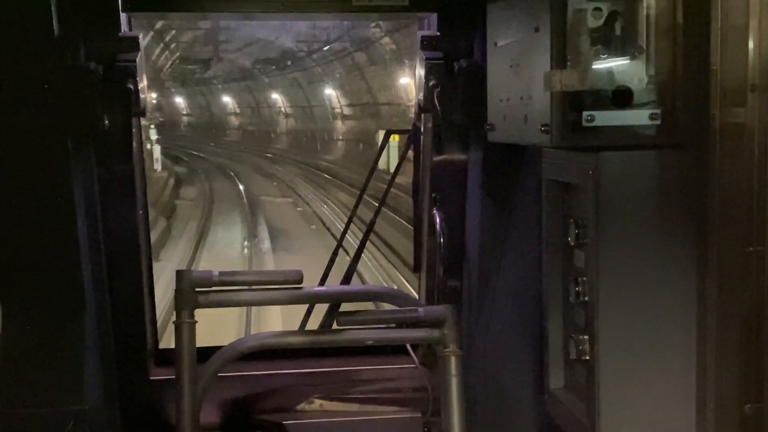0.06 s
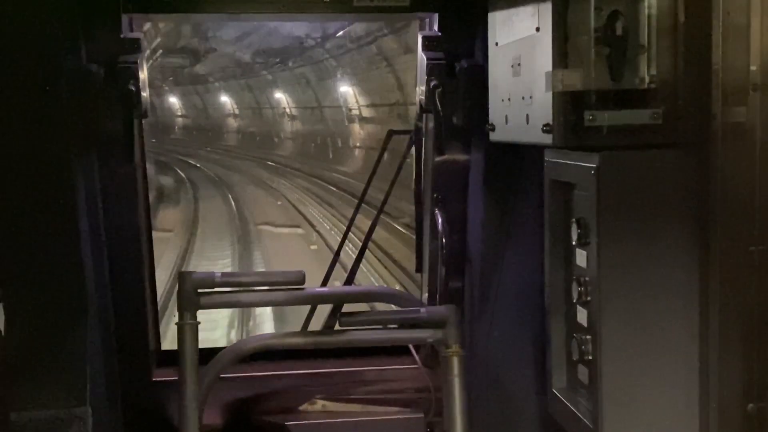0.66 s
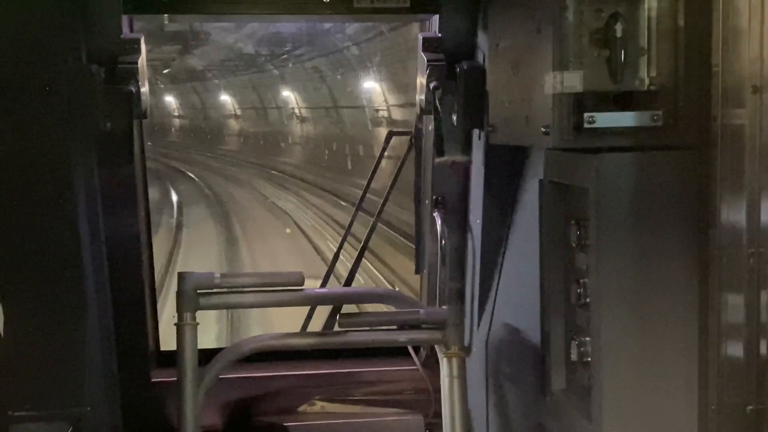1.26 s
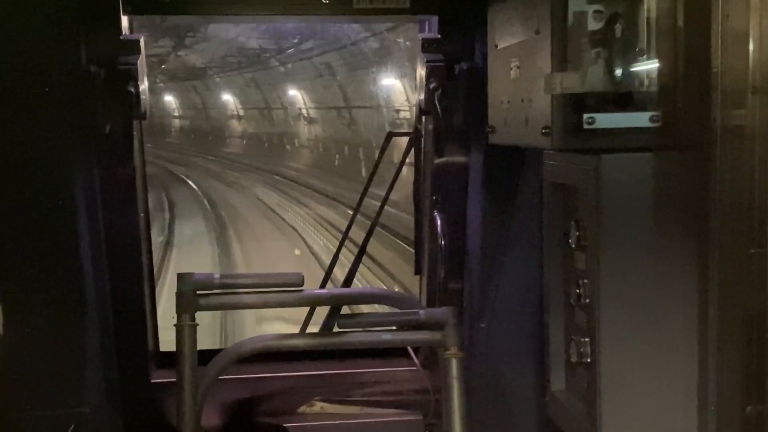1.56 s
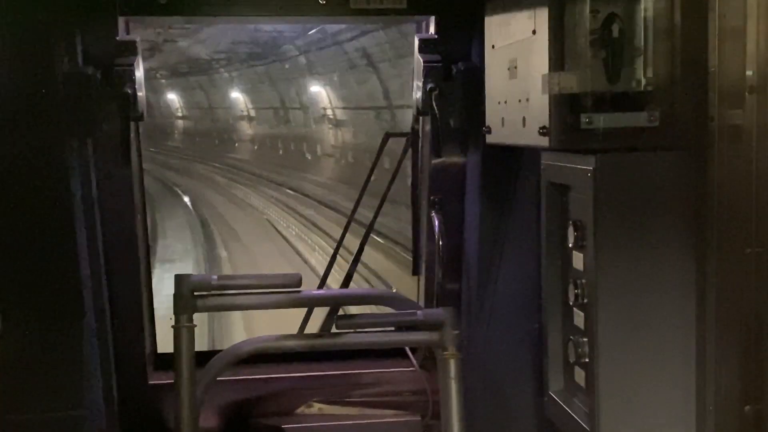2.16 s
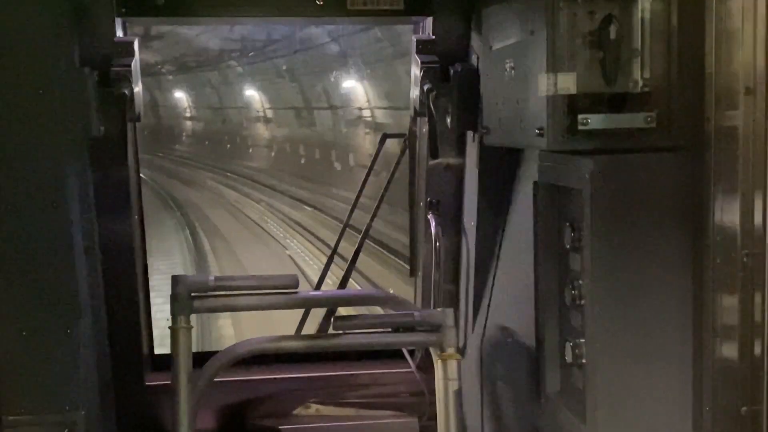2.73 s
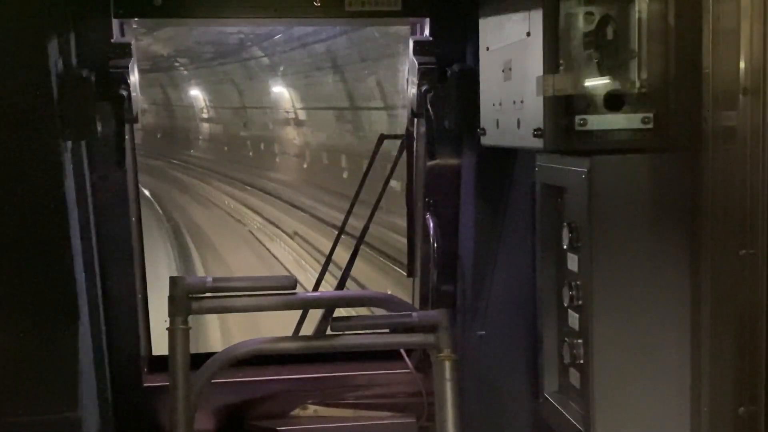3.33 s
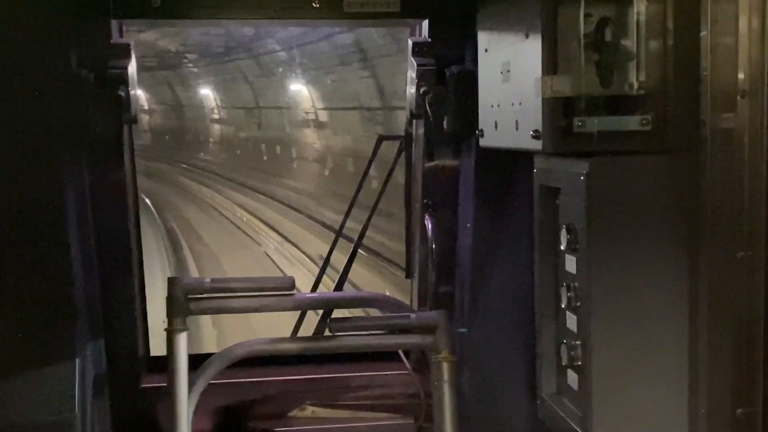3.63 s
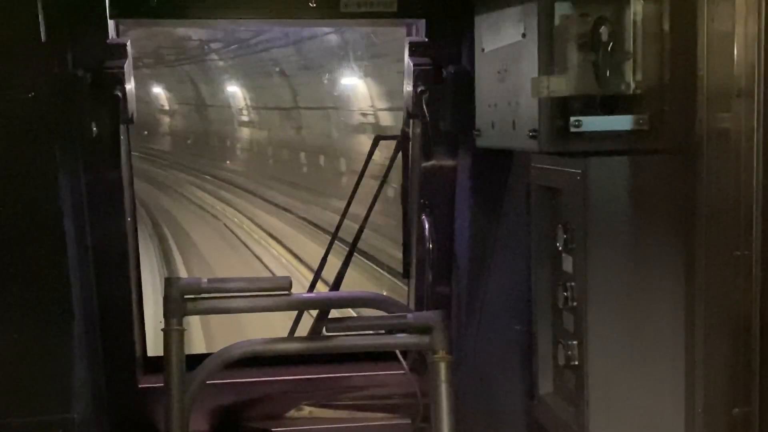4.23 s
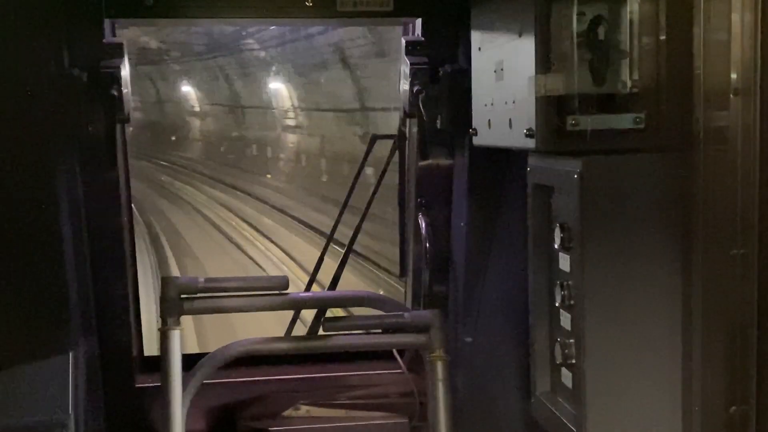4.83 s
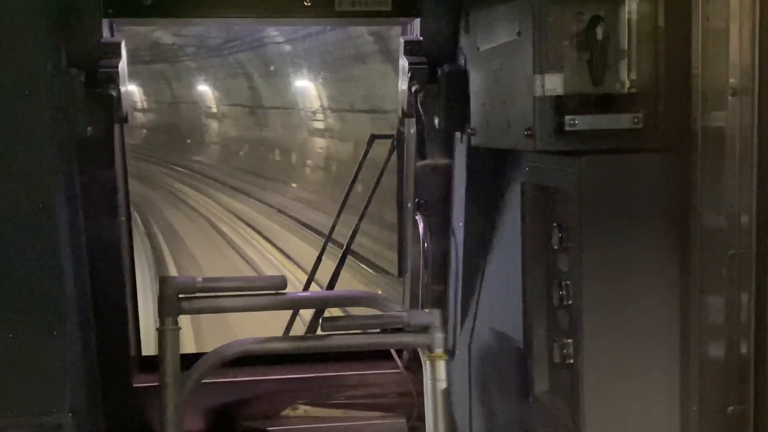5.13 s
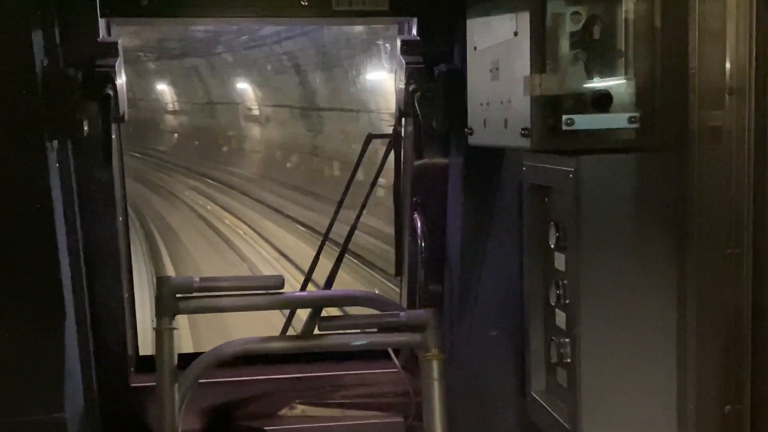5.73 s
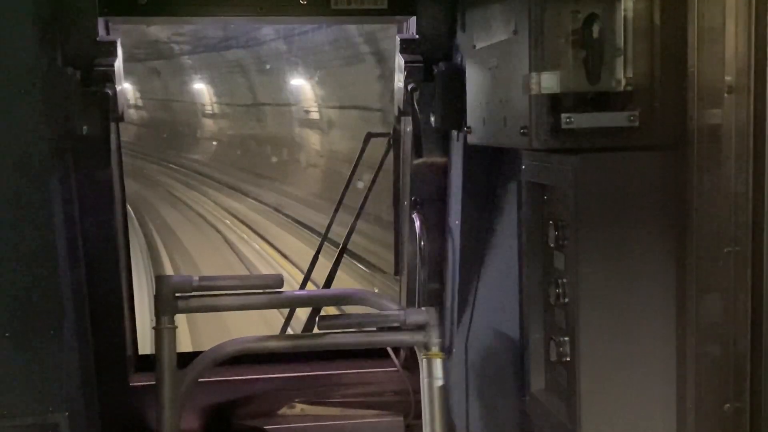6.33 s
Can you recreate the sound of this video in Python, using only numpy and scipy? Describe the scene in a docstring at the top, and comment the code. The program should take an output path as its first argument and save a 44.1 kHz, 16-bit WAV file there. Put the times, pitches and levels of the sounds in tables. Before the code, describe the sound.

Heard behind the windscreen of a subway train in a tunnel, the car rumbles steadily under rushing air and a slowly easing motor hum. As the bend tightens, the rails set up a pulsing low drone and a wavering howl, both strongest in the second half. Steel wheels growl, scrape and grind against the track, giving short squeals, and scattered dull knocks come up through the floor.

```python
"""Subway front car in a long tunnel curve.

The body rumbles and the traction motors hum under a steady rush of air. As the curve tightens the
wheels creep sideways: the bogie growls, the flanges scrub, hiss and squeal. Rail flaws knock, and
rippled rail drives a throbbing drone near 250 Hz with a rough howl near its octave."""
import sys
import numpy as np
from scipy import signal
from scipy.fft import rfft, irfft
from scipy.io import wavfile

SR = 44100
rng = np.random.default_rng(int(sys.argv[2]) if len(sys.argv) > 2 else 0)


def transcribe(u):
    """Save the signal u as a 16-bit wav file named by the first command-line argument.

    u: samples, shape (n,) or (channels, n), limited to [-1, 1]; the rate is SR.
    q: integer samples, one column per channel.
    """
    v = np.clip(np.atleast_2d(u).T, -1, 1)
    q = np.round(v * 32767).astype(np.int16)
    wavfile.write(sys.argv[1], SR, q)


N = 290178
TIME = np.arange(N) / SR
FREQ = np.maximum(np.arange(N // 2 + 1) * SR / N, 1)
SIDES = np.array([[1], [-1]])  # left, right

# phase lead of the left ear in the cab: f/Hz, lead/rad
EAR_LEAD = [(120, -0.58), (260, 0.25), (400, -1.2), (490, .25), (650, -0.27), (1200, 0.058), (1900, 0.92),
            (2500, -0.53), (3400, -0.57), (5500, 0)]


def gain_of(db):
    """Decibels to amplitude."""
    return 10 ** (np.asarray(db) / 20)


def unit(x):
    """Scale to rms 1."""
    return x / np.sqrt(np.mean(x ** 2))


def controls(table):
    """Each column after t/s, interpolated per sample."""
    times_s, *columns = np.transpose(table)
    return [np.interp(TIME, times_s, column) for column in columns]


def across(points):
    """Points joined on a log-frequency axis."""
    hz, value = np.transpose(points)
    return np.interp(np.log(FREQ), np.log(hz), value)


def bell(hz, width_hz, db=0):
    """Gain of a Gaussian band."""
    return gain_of(db) * np.exp(-((FREQ - hz) / width_hz) ** 2)


def bump(at_s, half_s):
    """Gaussian rise and fall around a moment."""
    return np.exp(-((TIME - at_s) / half_s) ** 2)


def walk(rate_hz):
    """Smooth random drift, rms 1."""
    lowpass = np.exp(-(FREQ / rate_hz) ** 2) * (FREQ > 1)
    return unit(irfft(rfft(rng.standard_normal(N)) * lowpass, N))


def sustained(x, hold_s, firmness):
    """Continuously driven vibration: the phase wanders, the strength fades less than in noise."""
    power = np.abs(signal.hilbert(x, axis=1)) ** 2
    smooth_power = irfft(rfft(power.mean(axis=0)) * np.exp(-(FREQ * hold_s) ** 2), N)
    x = x / (np.abs(smooth_power) + 0.08) ** (firmness / 2)
    return x / np.std(x.mean(axis=0))


def glide(x, speed):
    """Resample a vibration at a changing speed ratio."""
    place = np.cumsum(speed)
    return np.array([np.interp(place, np.arange(N), ear, period=N) for ear in x])


def cab_noise(colour):
    """Unit-level shaped noise; bass reaches both ears alike, the middle arrives from all the walls."""
    # likeness of the two ears: f/Hz, coherence
    coherence = [(100, .999), (180, 1), (260, 0.87), (360, 0.97), (500, 0.58), (720, 0.28), (950, 0.33),
                 (1600, 0.3), (1800, .84), (2200, 1), (6000, 0.86)]
    # left minus right: f/Hz, level/dB
    balance = [(50, -5.5), (110, -1), (205, -6), (290, 1), (430, 2.5), (540, -6.5), (730, 0), (1000, -1),
               (1400, -3.5), (1850, 1), (2900, 0)]
    mid, side = rfft(rng.standard_normal((2, N)))
    alike = np.clip(across(coherence), 0, 1)
    short_waves = 1 / (1 + (130 / FREQ) ** 4)
    ears = np.sqrt(1 + alike) * mid + SIDES * np.sqrt(1 - alike) * short_waves * side
    ears *= gain_of(SIDES * across(balance) * short_waves / 2)
    ears *= np.exp(0.5j * SIDES * across(EAR_LEAD) * short_waves)
    x = irfft(ears * colour, N)
    return x / np.std(x.mean(axis=0))


def cab_tone(hz, lead_rad, scatter_rad):
    """Tone of moving pitch; cab echoes shift its phase between the ears."""
    phase = 2 * np.pi * (np.cumsum(hz) / SR + rng.random())
    shift_rad = lead_rad + scatter_rad * walk(11)
    return np.sqrt(2) * np.cos(phase + SIDES * shift_rad / 2)


def car_body():
    """The body rumbles, and booms as it lurches on its springs."""
    # rumble spectrum: f/Hz, relative level/dB
    rumble_spectrum = [(15, -41), (32, -6.5), (48, 1.5), (66, 6), (88, 1.5), (120, 5.5), (185, 5.5),
                       (255, -4), (310, -21.5), (380, -23.5), (600, -17.5), (1200, -81.5)]
    # rumble envelope: t/s, relative level/dB
    rumble_curve = [(0, -24.5), (1.1, -26.5), (1.37, -28), (1.7, -25.5), (2.15, -26.5), (3.0, -25),
                    (4.6, -29), (5.5, -30), (6.58, -28)]
    # booms: t/s, half length/s, f/Hz, level/dB
    lurches = [(.79, 0.035, 118, -21), (1.1, 0.11, 148, -27), (1.72, 0.14, 137.5, -23.5),
               (3.873, 0.16, 61, -26)]
    rumble_db, = controls(rumble_curve)
    rumble = sustained(cab_noise(gain_of(across(rumble_spectrum))), hold_s=0.51, firmness=0.14)
    booms = sum(cab_noise(bell(hz, width_hz=20)) * gain_of(db) * bump(at_s, half_s)
                for at_s, half_s, hz, db in lurches)
    return rumble * gain_of(rumble_db + 1.5) + booms


def air_rush():
    """Air rushes past the cab and softens a little late in the curve."""
    # airflow spectrum: f/Hz, relative level/dB
    spectrum = [(1000, -29), (1640, -5), (1900, -1), (2300, 2.5), (2570, -1), (2930, -13.5), (3200, -14),
                (3500, -13.5), (3950, -25), (4350, -25), (4680, -19.5), (5200, -29.5), (6200, -31.5),
                (9000, -57.5)]
    level_db = np.interp(TIME, [4.36, 4.69], [-33.5, -35.5])
    return cab_noise(gain_of(across(spectrum))) * gain_of(level_db + 0.59 * walk(22))


def motors():
    """Traction motors hum and gears whine, easing off steadily; the whine fades faster."""
    # gear mesh harmonics 1-4: level at full effort/dB, dB lost per dB of easing
    harmonics = [(-27.5, 0.5), (-47, 1), (-52.5, 0.5), (-39.5, 3)]
    # motor hum bands: f/Hz, width/Hz, relative level/dB
    hum_bands = [(446, 48, 5.5), (893, 120, -19), (1385, 85, -23)]
    # gear whine bands: f/Hz, width/Hz, relative level/dB
    whine_bands = [(1808, 80, 0), (3160, 75, -21), (5900, 90, -35)]
    effort_db = -1.5 * TIME
    tooth_hz, waver_hz, flutter_db = 453, 7, 3
    pitch_hz = tooth_hz + waver_hz * walk(30)
    mesh = 0
    for k, (db, fade) in enumerate(harmonics, 1):
        lead_rad = np.interp(k * tooth_hz, *np.transpose(EAR_LEAD))
        partial = cab_tone(k * pitch_hz, lead_rad, scatter_rad=0.38)
        mesh += partial * gain_of(db + fade * effort_db + flutter_db * walk(33))
    hum = cab_noise(sum(bell(*band) for band in hum_bands))
    whine = cab_noise(sum(bell(*band) for band in whine_bands))
    whine = sustained(whine, hold_s=0.018, firmness=0.85)
    return mesh + hum * gain_of(-24.5 + effort_db) + whine * gain_of(-35 + 3 * effort_db)


def inverter():
    """The inverter's faint whistle fades slowly."""
    # whistle peaks: f/Hz, nominal width/Hz, relative level/dB
    peaks = [(4799, 10, 0), (4800, 120, -11), (4110, 80, -19)]
    start_db, fade_db_per_s = -57, 1
    colour = sum(gain_of(db) / (1 + ((FREQ - hz) / (1.5 * width_hz)) ** 2) for hz, width_hz, db in peaks)
    return cab_noise(colour) * gain_of(start_db - fade_db_per_s * TIME + walk(4))


def friction(spectrum, curve, offset_db):
    """Rubbing noise of a given spectrum, following a level curve plus an offset."""
    level_db, = controls(curve)
    return cab_noise(gain_of(across(spectrum))) * gain_of(level_db + offset_db)


def wheel_creep():
    """Wheels creep sideways: the bogie growls, flanges scrub and scrape, steel hisses, rims grind."""
    # friction spectra: f/Hz, relative level/dB
    growl_spectrum = [(150, -17.5), (220, 9), (295, 9.5), (350, 1.5), (385, 6.5), (450, 1.5), (590, 1.5),
                      (670, -4), (740, -11.5), (920, -12), (1100, -33.5), (2000, -64.5)]
    scrub_spectrum = [(450, -9), (670, 6.5), (740, 11.5), (815, 7.5), (910, 1.5), (1030, 3), (1150, 6.5),
                      (1270, -0.5), (1400, -0.5), (1600, -4), (2100, -7.5), (3000, -59)]
    hiss_spectrum = [(2500, 0.5), (4200, 6.5), (5600, 3), (6600, -1.5), (7500, -0.5), (8700, -13.5),
                     (9800, -5.5), (10800, -13.5), (12000, -32.5), (14500, -22.5), (16000, -37.5)]
    scrape_spectrum = [(3000, -14), (5000, 4), (7500, -0.5), (9700, -4.5), (12000, -18.5), (14300, -2),
                       (16000, -22.5)]
    # friction envelopes: t/s, relative level/dB
    growl_curve = [(0, -42), (0.88, -35.5), (1.03, -27.5), (1.33, -25), (1.58, -31), (1.74, -25.5),
                   (2.45, -27.5), (2.8, -26.5), (4.3, -32), (5.2, -35.5), (6.58, -31)]
    scrub_curve = [(0, -43), (0.9, -41.5), (1.65, -42), (2.2, -35), (3.25, -29.5), (3.92, -33), (4.25, -28),
                   (4.9, -32), (5.8, -30.5), (6.58, -31)]
    hiss_curve = [(0, -63), (0.5, -61), (0.85, -56), (1.6, -60), (2.1, -57.5), (2.95, -57.5), (3.2, -52.5),
                  (3.8, -53.5), (4.28, -49), (4.7, -51.5), (4.88, -54.5), (5.15, -52), (5.47, -49.5),
                  (5.7, -54), (6.1, -54.5), (6.25, -58), (6.58, -56)]
    # swells as a flange bites or a rim grinds: t/s, half length/s, level/dB
    bites = [(1.1, 0.25, -67), (1.95, .12, -64), (2.55, 0.13, -67.5), (4.399, .48, -60.5),
             (5.287, .22, -62.5)]
    grinds = [(1.07, 0.036, -35.5), (2.755, 0.2, -43), (3.173, .17, -38), (3.8, 0.32, -46.5),
              (4.325, 0.072, -37.5), (5.721, 0.17, -41.5), (6.118, 0.099, -39.5)]
    judder_db = walk(26)  # shared contact pressure
    growl = friction(growl_spectrum, growl_curve, 7 + judder_db / 2)
    scrub = friction(scrub_spectrum, scrub_curve, 0.74 * judder_db)
    hiss = friction(hiss_spectrum, hiss_curve, 0.72 * judder_db)
    bite = sum(gain_of(db) * bump(at_s, half_s) for at_s, half_s, db in bites)
    scrape = cab_noise(gain_of(across(scrape_spectrum))) * bite * gain_of(walk(30))
    pressure = sum(gain_of(db) * bump(at_s, half_s) for at_s, half_s, db in grinds)
    rim_resonance = bell(hz=2234, width_hz=130)
    grind = cab_noise(rim_resonance) * pressure * gain_of(judder_db)
    return growl + scrub + hiss + scrape + grind


def tone_swells():
    """Narrow resonances build up and die away: wheels ring under the flange, and early on the gear whine swells
    near 1.8 kHz."""
    # ringing wheels, and swells of the gear whine near 1.8 kHz early on: t/s, half length/s, f/Hz, level/dB
    squeals = [(0.06, 0.12, 1810, -36), (.45, 0.037, 1846, -30.5), (0.53, 0.022, 1795, -30.5),
               (0.848, 0.41, 884, -40.5), (1.39, .1, 1764, -39), (3.212, 0.09, 1130, -36.5),
               (3.241, 0.14, 525, -22.5), (3.598, 0.15, 450, -25.5), (3.632, 0.085, 735, -32.5),
               (4.301, 0.27, 787, -32.5), (4.254, 0.25, 515, -26.5), (5.071, 0.091, 461, -19),
               (5.705, 0.064, 1153, -32.5), (5.761, 0.051, 464, -18)]
    sound = 0
    for at_s, half_s, hz, db in squeals:
        ring = sustained(cab_noise(bell(hz, width_hz=39)), hold_s=0.034, firmness=1)
        sound += ring * gain_of(db) * bump(at_s, half_s)
    return sound


def wheel_knocks():
    """Wheels strike rail flaws; dull, quickly damped blows reach the cab through the bogie."""
    # blows: t/s, f/Hz, level/dB
    knocks = [(2.65, 482.5, -14.5), (3.111, 504.7, -14.5), (3.218, 521.6, -12), (3.509, 497.5, -18),
              (4.279, 498.1, -10), (4.694, 525.6, -20), (6.066, 477, -11), (6.501, 473, -9.5)]
    attack_s, decay_s = 0.0071, 0.02
    envelope = 0
    for at_s, _, db in knocks:
        rise = np.clip((TIME - at_s) / attack_s, 0, 1)
        envelope += gain_of(db) * rise * np.exp(-np.abs(TIME - at_s) / decay_s)
    hz, _ = controls(knocks)
    thud = cab_noise(bell(hz=504, width_hz=110)) * gain_of(-4.5)
    return envelope * (cab_tone(hz, lead_rad=0.22, scatter_rad=0.34) + thud)


def rail_howl():
    """A rough partial near the drone's octave wavers and swells."""
    # howl pitch and envelope: t/s, f/Hz, level/dB
    howl_curve = [(0, 466.2, -29.5), (1.02, 463.7, -28), (1.22, 463.3, -18.5), (1.48, 472.2, -27.5),
                  (2.45, 472.5, -28), (2.7, 471.7, -23.5), (3.0, 477.6, -27), (3.25, 495.1, -26.5),
                  (3.68, 482, -19), (3.9, 479.7, -23), (4.2, 494.4, -18.5), (4.55, 487, -21.5),
                  (5.1, 475, -19.5), (5.5, 476.1, -22), (6.58, 471.3, -21.5)]
    centre_hz = 476.8
    hz, db = controls(howl_curve)
    colour = bell(centre_hz, width_hz=29) + bell(centre_hz, width_hz=70, db=-10)
    partial = sustained(cab_noise(colour), hold_s=0.024, firmness=0.55)
    return glide(partial, hz / centre_hz) * gain_of(db)


def rail_ripple():
    """Ripples shake the wheels at their passing rate; on deep patches one clear throb takes over."""
    # ripple depth as drone strength: t/s, relative level/dB
    ripple_curve = [(0, -42), (0.6, -37.5), (0.9, -23.5), (1.2, -18), (1.6, -22.5), (2.1, -19), (2.95, -17),
                    (3.35, -16), (4.35, -16.5), (4.9, -13), (5.45, -15.5), (5.8, -14.5), (6.58, -18.5)]
    # dropouts on smooth rail: t/s, half length/s, attenuation/dB
    lulls = [(3.063, 0.016, 3), (3.495, 0.014, 18), (3.788, 0.072, 26), (4.163, 0.0096, 12),
             (4.266, 0.009, 22), (4.52, 0.014, 8), (4.841, 0.068, 11), (5.133, 0.024, 10),
             (5.643, 0.026, 6), (5.83, 0.039, 4), (6.244, .04, -2)]
    # deep patches: t/s, half length/s, f/Hz, level/dB
    throbs = [(.96, 0.011, 244, -13.5), (1.294, 0.017, 249.4, -13.5), (2.067, 0.021, 252.2, -12),
              (2.244, 0.014, 241, -13), (3.178, 0.03, 268.4, -13), (3.21, 0.014, 258.6, -12.5),
              (3.332, 0.025, 263.2, -7.5), (3.398, 0.017, 258.1, -12.5), (3.522, 0.017, 249.1, -8.5),
              (3.587, 0.027, 248, -12), (3.664, 0.012, 239.6, -8.5), (3.722, 0.019, 244, -9.5),
              (3.878, 0.046, 251.4, -14), (3.957, 0.025, 247.2, -8.5), (4.009, 0.019, 248.2, -8),
              (4.098, 0.021, 265.8, -8), (4.129, 0.0084, 249.7, -9.5), (4.221, 0.028, 261.2, -6),
              (4.292, 0.0087, 261.6, -9.5), (4.338, 0.021, 259.7, -11), (4.397, 0.021, 254.8, -5.5),
              (4.438, .016, 249.3, -7), (4.486, 0.025, 255.2, -7.5), (4.559, 0.016, 255, -10.5),
              (4.621, 0.022, 240, -11.5), (4.693, 0.013, 258.3, -11.5), (4.748, 0.01, 257.5, -12.5),
              (4.918, 0.022, 248.7, -15), (5.272, 0.014, 261.2, -9.5), (5.308, 0.012, 251.8, -10.5),
              (5.389, 0.019, 259.9, -8), (5.425, .016, 250.3, -9.5), (5.496, 0.031, 261.7, -8),
              (5.569, 0.038, 260.8, -10), (5.713, .02, 245, -10.5), (5.94, 0.031, 260.3, -10.5),
              (6.369, 0.039, 242.1, -14.5)]
    ripple_db, = controls(ripple_curve)
    lull_db = sum(db * bump(at_s, half_s) for at_s, half_s, db in lulls)
    strength = gain_of(ripple_db - lull_db + 0.5 * walk(16))
    speed = np.interp(TIME, [0, 1.201], [0.97, 1])  # the train gathers speed into the curve
    # even ripples give a narrow core, uneven ones a rough skirt
    core = sustained(cab_noise(bell(hz=259, width_hz=14)), hold_s=0.025, firmness=1)
    skirt = sustained(cab_noise(bell(hz=232.8, width_hz=27)), hold_s=0.044, firmness=1)
    drone = glide((core + skirt) * gain_of(-4.5), speed) * strength
    throb_gain = sum(gain_of(db) * bump(at_s, half_s) for at_s, half_s, _, db in throbs)
    _, throb_hz, _ = controls(throbs)
    throb = cab_tone(throb_hz + 6.2 * walk(25), lead_rad=0.51, scatter_rad=0.54)
    ducking = np.hypot(1, throb_gain / gain_of(ripple_db))
    return drone / ducking + throb * throb_gain


def scene():
    """Stereo mix behind the windscreen."""
    rail = rail_ripple() + rail_howl()
    wheels = wheel_creep() + tone_swells() + wheel_knocks()
    return rail + wheels + car_body() + air_rush() + motors() + inverter()


def record(dry):
    """Soft limit on the highest peaks, then a steep low-pass."""
    cutoff_hz = 15200
    rounded = dry / (1 + dry ** 8) ** (1 / 8)
    lowpass = signal.ellip(8, 0.2, 70, cutoff_hz, fs=SR, output="sos")
    return signal.sosfilt(lowpass, rounded)


dry = scene()
out = record(dry)
transcribe(out)
```